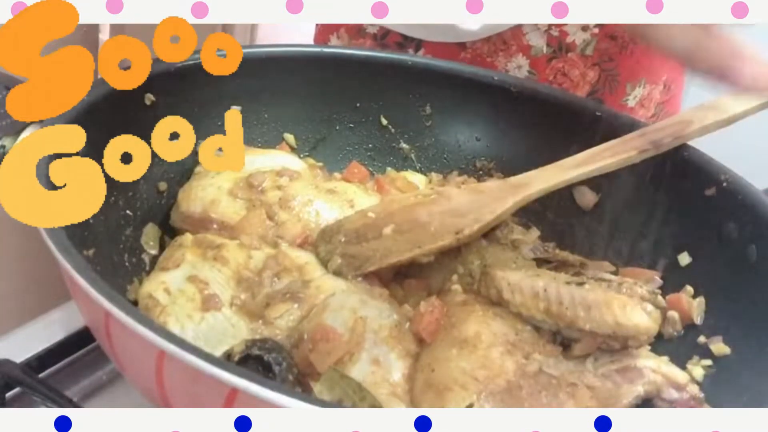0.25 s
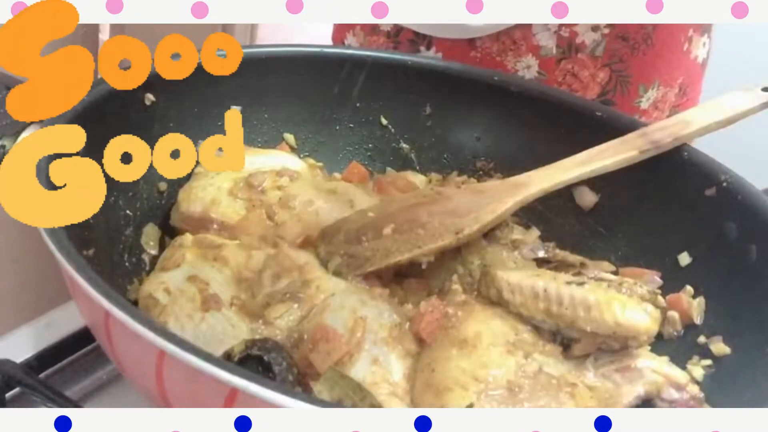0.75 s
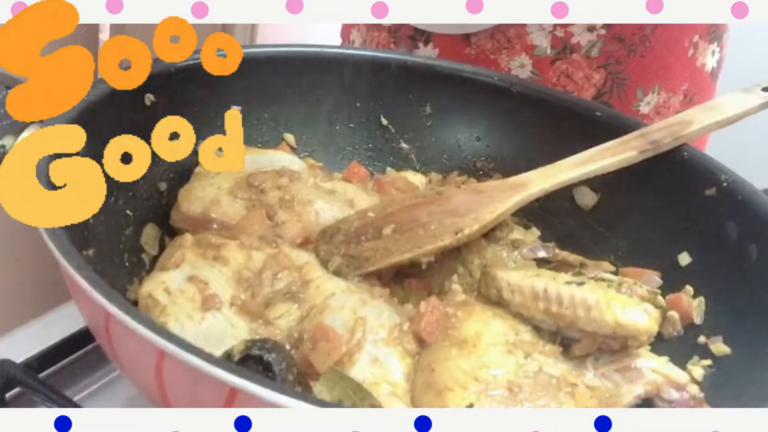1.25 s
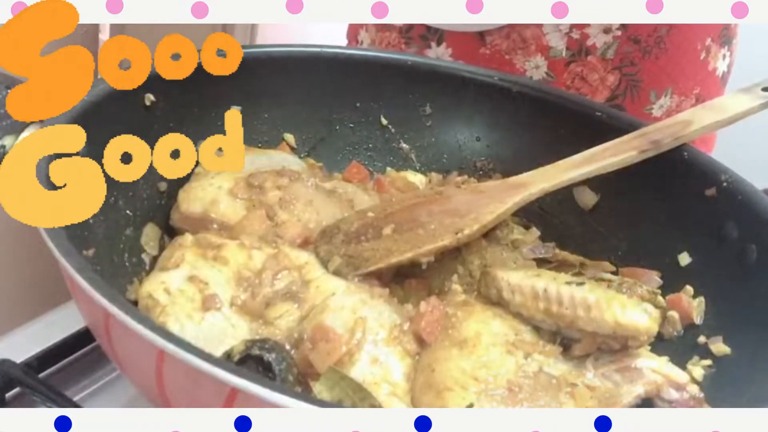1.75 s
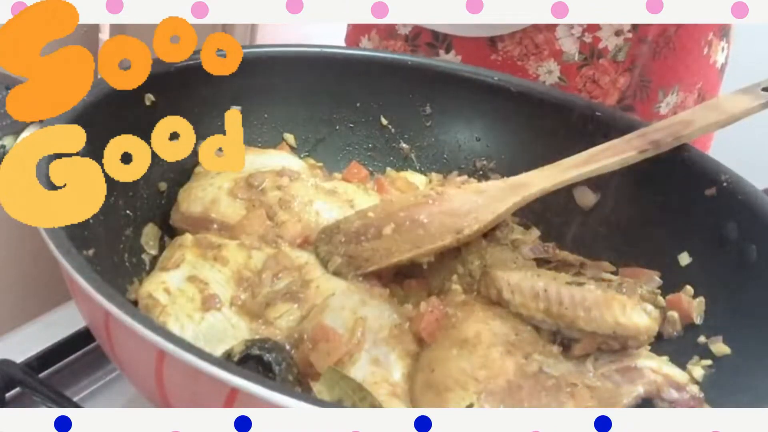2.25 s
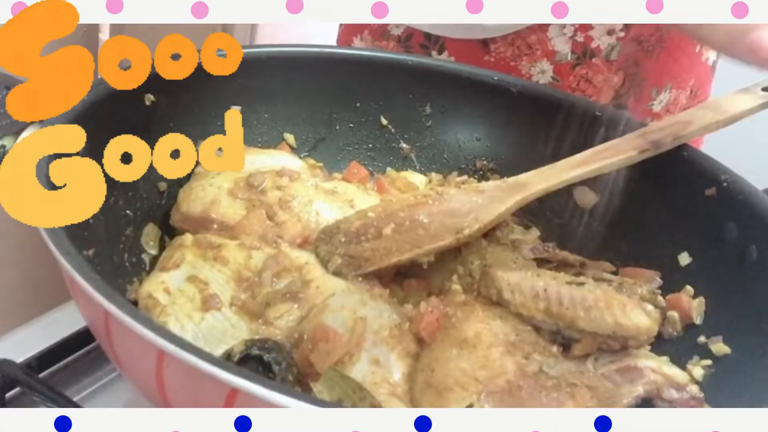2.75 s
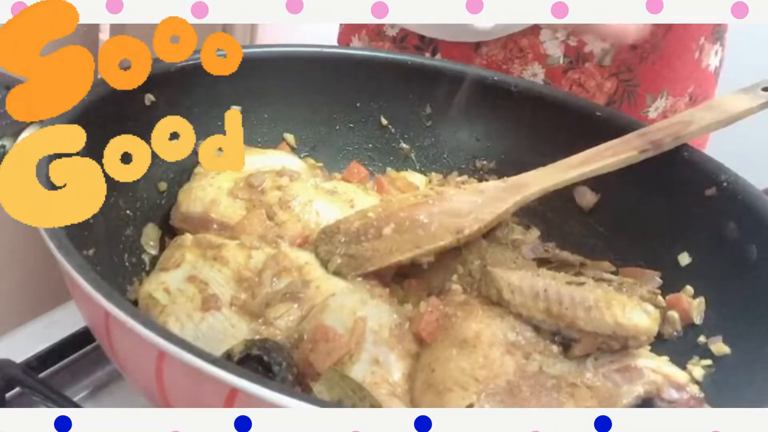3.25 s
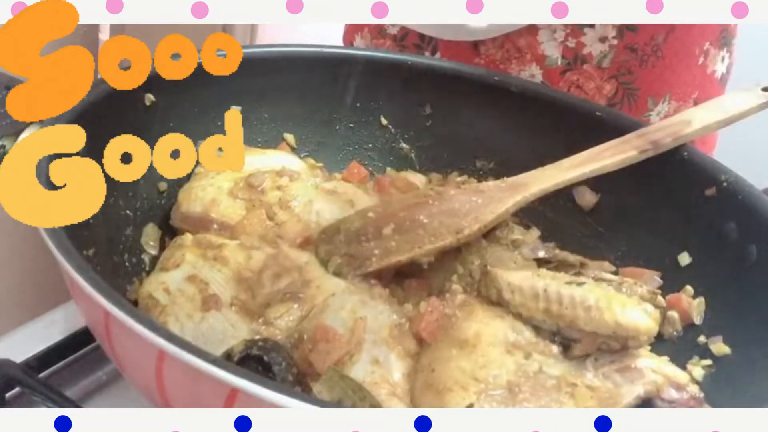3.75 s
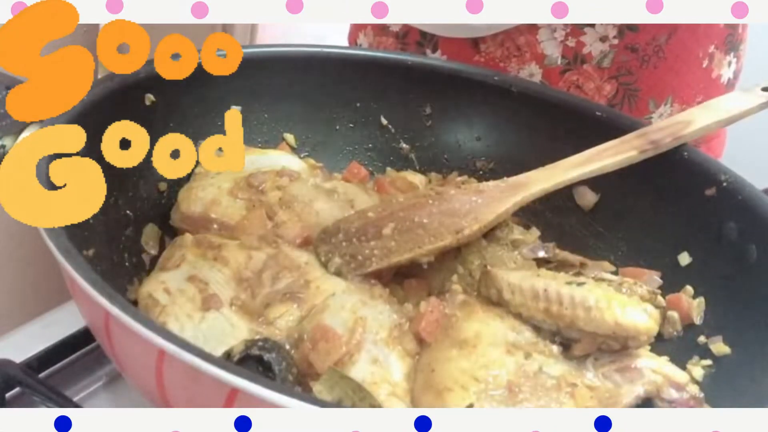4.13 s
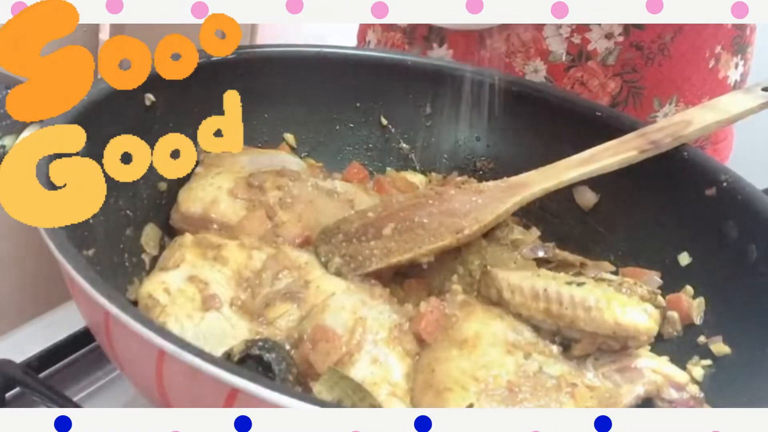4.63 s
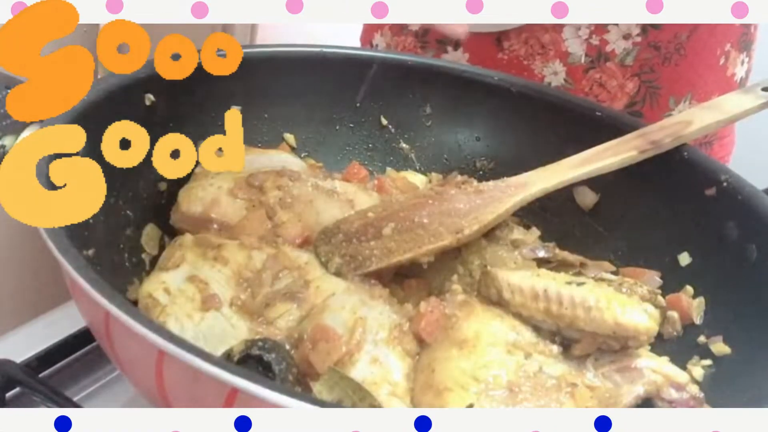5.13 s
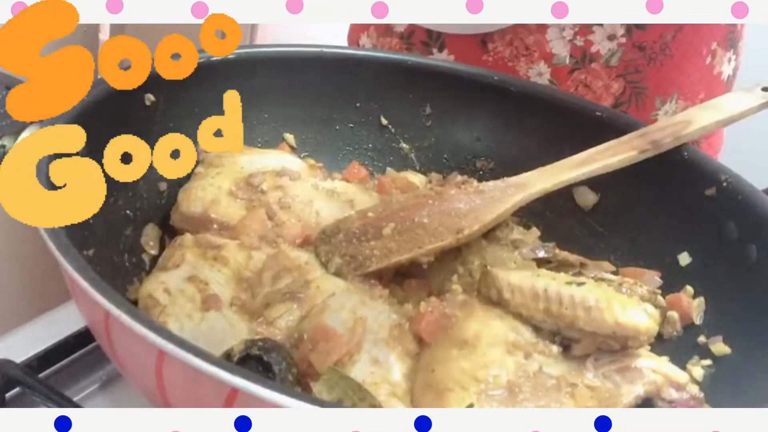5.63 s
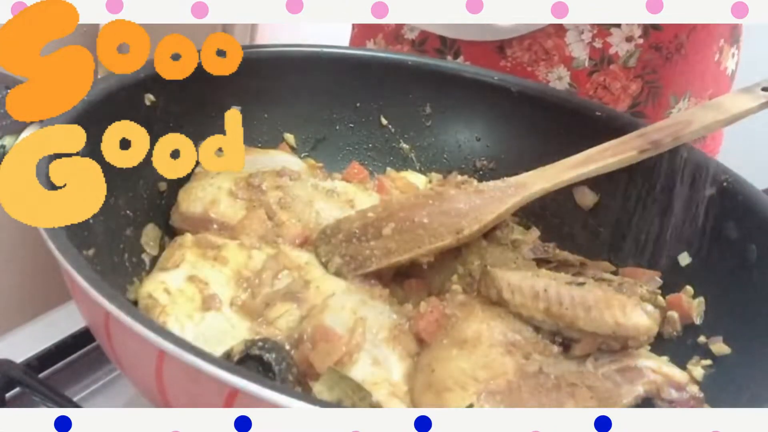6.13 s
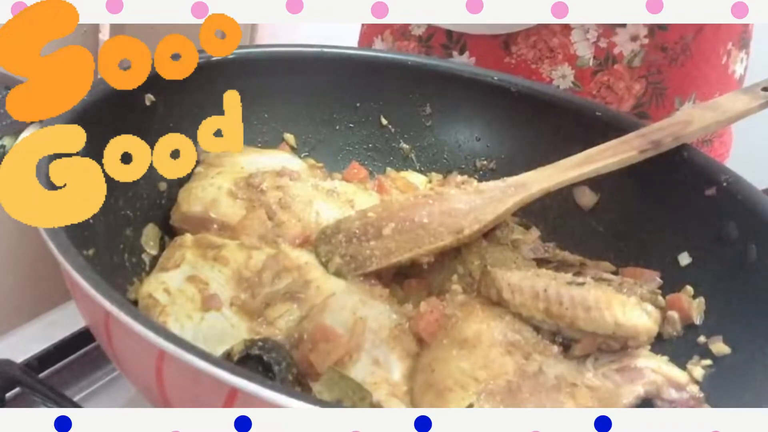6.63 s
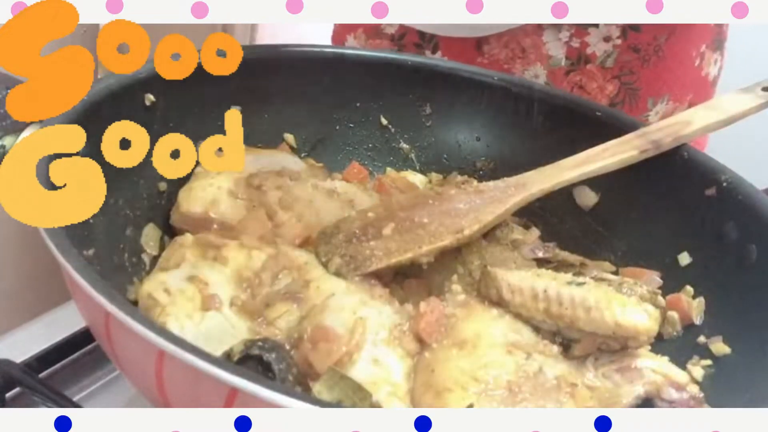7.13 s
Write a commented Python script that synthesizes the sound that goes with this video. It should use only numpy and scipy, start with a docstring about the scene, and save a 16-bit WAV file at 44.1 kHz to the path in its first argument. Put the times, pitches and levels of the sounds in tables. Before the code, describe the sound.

A close, dry salt shaker rattles back and forth in a small kitchen, boomy clacks alternating with bright hissing slides, ending in brief thin shakes.

```python
"""Coarse salt is shaken in a hollow tub close to a microphone, in a small kitchen.
Each swing throws the salt on the base, where it booms, then back on the lid, where it hisses:
streams of random grains drive resonances of the hollow, walls, lid and grip.
Lumps knock singly as taps with a spray of grains; the wrist's turn thumps low as a falling sine.
Shaped noise hums faintly below, and sparse echoes give the kitchen."""
import sys
import numpy as np
from scipy import signal
from scipy.io import wavfile

SR = 44100
rng = np.random.default_rng(int(sys.argv[2]) if len(sys.argv) > 2 else 0)


def log_audio(samples):
    """Write samples as a 16-bit WAV file to the path given in sys.argv[1]."""
    # one column per channel
    frames = np.atleast_2d(samples).T
    # limit to full scale, then quantise
    limited = np.clip(frames, -1, 1)
    pcm = np.round(limited * 32767).astype(np.int16)
    wavfile.write(sys.argv[1], SR, pcm)


N = 325458


def gain_of(db):
    """Amplitude factor of a level in dB."""
    return 10 ** (np.asarray(db) / 20)


def evened(x):
    """Scales x to unit RMS."""
    return x / np.sqrt(np.mean(x ** 2) + 1e-20)


def read(points, hz):
    """Interpolates (f/Hz, value) points over log frequency."""
    f, value = np.transpose(points)
    return np.interp(np.log(hz + 1), np.log(f + 1), value)


def ring(x, modes, low_hz):
    """Passes x through a causal body of unit energy; a small body radiates little below low_hz."""
    hz = abs(np.fft.fftfreq(8192, 1 / SR))
    power = 0
    for f_hz, width_hz, db in modes:
        power = power + gain_of(2 * db) / (1 + (2 * (hz - f_hz) / width_hz) ** 2) ** 1.5
    power = power / (1 + (low_hz / (hz + 1)) ** 8)
    log_gain = np.log(power + 1e-10) / 2
    minimum_phase = np.exp(np.conj(signal.hilbert(log_gain)))
    taps = np.fft.ifft(minimum_phase).real[:3000]
    return signal.oaconvolve(x, taps / np.linalg.norm(taps))[:N]


def scattered(x, modes, low_hz, count=6):
    """The salt lands now here, now there, and each spot favours other resonances."""
    spot = np.repeat(rng.integers(0, count, N // 300 + 1), 300)[:N]
    tilts_db = rng.standard_normal((count, len(modes)))
    tilts_db = 4 * (tilts_db - tilts_db.mean(0))
    out = np.zeros(N)
    for k in range(count):
        tilted = [(f_hz, width_hz, db + tilt) for (f_hz, width_hz, db), tilt in zip(modes, tilts_db[k])]
        out += ring(x * (spot == k), tilted, low_hz)
    return out


def grains(per_s, spread_db, clump_db):
    """Sparse taps of uneven size that swell in clumps, sudden at the front and trailing off."""
    size = gain_of(spread_db * np.minimum(rng.exponential(1, N), 5)) * rng.choice([-1, 1], N)
    fronts = rng.random(N) * (rng.random(N) < 200 / SR)
    clumps = signal.lfilter([1], [1, -np.exp(-1 / (0.0021 * SR))], fronts)
    landed = rng.random(N) < per_s / SR
    return evened(size * landed * (1 + gain_of(clump_db) * clumps))


# steady hum spectrum: (f/Hz, relative density/dB)
HUM_SPECTRUM = [(12, -41), (20, -2), (75, 2), (240, -9), (300, -4), (364, -12), (422, -6), (512, -16),
                (700, -7), (910, -44), (1540, -120)]
HUM_DB, HISS_DB = -56.5, -62.5


def hum():
    """Steady low kitchen noise: random spectra under a fixed curve, plus a faint hiss."""
    frames, hz = N // 512 + 5, np.fft.rfftfreq(2048, 1 / SR)
    real, imag = rng.standard_normal((frames, 1025, 2)).T
    spectra = (real + 1j * imag) * gain_of(read(HUM_SPECTRUM, hz)[:, None])
    steady = signal.istft(spectra, nperseg=2048, noverlap=1536)[1][:N]
    hiss = ring(rng.standard_normal(N), [(2320, 5900, 0)], low_hz=590)
    return gain_of(HUM_DB) * evened(steady) + gain_of(HISS_DB) * hiss


# deep rumble: (t/s, level/dB)
DEEP_LEVEL = [(0, -54), (.4, -53.5), (1.2, -58.5), (2.6, -54.5), (3.9, -63), (5, -54.5), (6.4, -61),
              (7.38, -57.5)]
LOW_DB = -59


def rumble():
    """Unsteady rumble: sparse random taps ring deep and low resonances."""
    level = gain_of(np.interp(np.arange(N) / SR, *np.transpose(DEEP_LEVEL)))
    deep = ring(grains(90, 1.4, 0.5), [(35, 39, -2), (67, 26, 3.0)], low_hz=24.8)
    low = ring(grains(120, 4.0, 2.5), [(142, 107, 0), (305, 94, -2.5), (430, 37, -8)], low_hz=81.4)
    return level * deep + gain_of(LOW_DB) * low


# reverberation: (f/Hz, t60/s)
KITCHEN_T60 = [(250, 1), (700, 0.2), (1800, 0.6), (5000, 0.59), (12000, 0.42)]


def kitchen(x):
    """Sparse echoes of random sign, each band dying at its own speed."""
    taps = np.zeros(SR // 2)
    at = np.arange(200, len(taps) - 20, 20)
    taps[at + rng.integers(0, 20, len(at))] = rng.choice([-1., 1.], len(at))
    hz, t, bands = signal.stft(taps, SR, nperseg=256)
    decay = gain_of(-60 * t / read(KITCHEN_T60, hz)[:, None])
    tail = signal.istft(bands * decay, SR, nperseg=256)[1]
    return signal.fftconvolve(x, tail / np.linalg.norm(tail))[:N]


# resonances of the hand-held tub as a whole: (f/Hz, width/Hz, relative level/dB)
GRIP_MODES = [(110, 33, -3), (205, 195, -7), (418, 84, -3.5), (537, 48, -3)]


def grip(x, low_hz):
    """The whole tub in the hand rings at its low resonances."""
    return ring(x, GRIP_MODES, low_hz)


# wrist turns: (t/s, level/dB, pitch drop/Hz)
WRIST_TURNS = [(.136, -33, 250), (0.369, -44, 200), (.66, -41, 202), (1.331, -35, 276), (1.765, -35, 253),
               (2.0, -44, 280), (2.089, -39.5, 200), (2.392, -33.5, 254), (2.65, -37.5, 250),
               (2.69, -46, 121), (3.011, -45, 250), (3.345, -29.5, 254), (3.739, -41.5, 277),
               (4.105, -37.5, 149), (4.49, -35, 304), (4.905, -39.5, 110), (5.268, -34.5, 167),
               (5.74, -40, 286), (5.984, -38.5, 278), (6.076, -31, 249), (6.558, -47, 287),
               (7.001, -44, 198), (7.216, -41, 179)]


def thumps():
    """A few cycles that slide down to the deep bass, and a dull uneven knock in the grip."""
    sines, knocks, t = np.zeros(N + 5000), np.zeros(N + 5000), np.arange(4000) / SR
    for start_s, db, drop_hz in WRIST_TURNS:
        turns = np.cumsum(40 + drop_hz * np.exp(-t / 0.0098)) / SR
        swell = (1 - np.exp(-t / 0.0023)) * gain_of(db - 60 * t / 0.14)
        at = int(start_s * SR)
        sines[at:][:len(t)] += swell * np.sin(2 * np.pi * turns)
        knocks[at:][:len(t)] += swell * rng.standard_normal(len(t))
    return sines[:N] + gain_of(-12.5) * grip(knocks, low_hz=68.7)


TAIL_OFF_DB_PER_S2 = 303  # the last grains settle ever faster


def streams(rows, start_db, fall_db_per_s):
    """Each stream sets in suddenly, builds to its level and dies away; streams add in power."""
    power = np.zeros(N + SR)
    t = np.arange(SR // 2) / SR
    for start_s, build_s, db in rows:
        rise_db = start_db * (1 - t / build_s)
        over_s = t - build_s
        fall_db = -fall_db_per_s * over_s - TAIL_OFF_DB_PER_S2 * over_s ** 2
        shape_db = np.where(over_s < 0, rise_db, fall_db)
        power[int(start_s * SR):][:len(t)] += gain_of(db + shape_db) ** 2
    return np.sqrt(power[:N])


# salt sliding back on the lid: (t/s, length/s, hiss level/dB)
LID_SLIDES = [(0, .15, -35), (.39, 0.12, -36), (.6, 0.07, -36.5), (.71, 0.065, -35.5), (1.0, 0.086, -41.5),
              (1.32, 0.099, -40.5), (1.46, 0.073, -46), (1.64, 0.025, -37.5), (1.74, .09, -41.5),
              (1.94, 0.21, -38), (2.39, .03, -40), (2.645, .14, -35.5), (2.958, 0.15, -45),
              (3.072, .06, -38), (3.35, 0.015, -37), (3.46, .06, -39.5), (3.72, 0.14, -39.5),
              (4.05, 0.19, -40.5), (4.49, .18, -39.5), (4.89, .13, -42.5), (5.2, 0.21, -40.5),
              (5.56, 0.26, -45), (5.99, 0.17, -38.5), (6.35, 0.1, -41), (6.911, 0.062, -29.5),
              (7.088, 0.063, -32.5), (7.264, 0.063, -29)]
SLIDE_START_DB, SLIDE_FALL_DB_PER_S, SLIDE_BOOM_DB = -3, 195, -17.5
# salt thrown on the base: (t/s, build-up/s, boom level/dB, hiss level/dB)
BASE_THROWS = [(0, 0.017, -45.5, -58), (0.204, 0.087, -32, -36.5), (0.517, 0.012, -25, -33.5),
               (0.808, 0.089, -30.5, -36), (1.15, 0.042, -29, -38), (1.525, 0.037, -27.5, -38.5),
               (1.835, 0.04, -34, -34), (2.155, 0.02, -32, -32.5), (2.466, 0.059, -29, -37.5),
               (2.802, .016, -44, -36), (3.149, 0.025, -27, -30.5), (3.537, 0.056, -25.5, -35),
               (3.905, 0.059, -30, -35.5), (4.285, 0.057, -33.5, -37), (4.687, 0.076, -33.5, -42),
               (5.074, 0.051, -29.5, -35), (5.438, 0.04, -27.5, -35.5), (5.808, 0.074, -36.5, -36),
               (6.138, .08, -33, -38), (6.505, 0.045, -51, -39), (6.553, 0.006, -21.5, -35)]
THROW_START_DB, BOOM_FALL_DB_PER_S, HISS_FALL_DB_PER_S = -6, 244, 107


def swings():
    """Envelopes of the salt on base and lid; throws also hiss and slides also boom."""
    slides = streams(LID_SLIDES, SLIDE_START_DB, SLIDE_FALL_DB_PER_S)
    boom_rows = [(start, build, boom_db) for start, build, boom_db, _ in BASE_THROWS]
    hiss_rows = [(start, build, hiss_db) for start, build, _, hiss_db in BASE_THROWS]
    boom = streams(boom_rows, THROW_START_DB, BOOM_FALL_DB_PER_S)
    hiss = streams(hiss_rows, SLIDE_START_DB, HISS_FALL_DB_PER_S)
    return np.hypot(boom, gain_of(SLIDE_BOOM_DB) * slides), np.hypot(hiss, slides)


# single lumps: (t/s, relative level/dB, height in the tub: 0 base - 1 lid)
SALT_LUMPS = [(.081, -16.5, 0.87), (.133, -19, 0.91), (.208, -19.5, 0.98), (.231, -18.5, .01),
              (.252, -17, 0.48), (.265, -10.5, 0.083), (0.291, -28, .05), (.305, -27, 1),
              (.382, -17.5, 0.84), (.442, -32.5, .95), (.529, -14.5, 0.031), (.547, -11, 0.19),
              (.714, -33, .75), (.728, -24, 0.93), (.75, -27, 1), (.824, -17.5, .2), (.848, -21, .1),
              (.862, -10.5, .01), (1.068, -16.5, 0.73), (1.151, -16.5, 0.12), (1.278, -18, 0.7),
              (1.329, -28.5, 0.26), (1.498, -19, 0.52), (1.5264, -7, 0.011), (1.72, -18.5, 0.79),
              (1.764, -17.5, .7), (1.836, -13.5, .01), (1.877, -13.5, 0.23), (1.958, -16.5, 0.66),
              (1.999, -26.5, .4), (2.083, -14, 0.77), (2.16, -21, 0.064), (2.192, -9.5, 0.49),
              (2.331, -24, 0.47), (2.392, -23, 0.53), (2.467, -9.5, 0.58), (2.483, -12.5, 0.085),
              (2.519, -13.5, 0.15), (2.651, -32, .7), (2.743, -18, 0.94), (2.808, -10, 0.083),
              (2.826, -12, 0.56), (2.962, -31, 0.93), (2.983, -18, 0.83), (3.081, -20, 0.88),
              (3.1487, -1.5, 0.0075), (3.222, -15, 0.15), (3.274, -27, 0.96), (3.345, -21.5, 0.32),
              (3.464, -33, 1), (3.539, -15, .33), (3.551, -12.5, 0.12), (3.573, -9.5, .01),
              (3.612, -11.5, 0.18), (3.68, -14, 0.74), (3.797, -30, 0.5), (3.889, -14.5, 0.79),
              (3.911, -18, 0.16), (3.934, -13, .01), (4.17, -47, 0.24), (4.212, -27.5, 0.99),
              (4.289, -24, 0.11), (4.304, -14, 0.14), (4.361, -14.5, .25), (4.374, -15, 0.089),
              (4.49, -27.5, .33), (4.5, -21.5, 0.66), (4.603, -30, 0.92), (4.639, -35, .7),
              (4.692, -18, 0.24), (4.707, -23, .2), (4.745, -13, 0.061), (4.929, -27, 0.98),
              (4.966, -19.5, 0.74), (5.039, -15, 0.61), (5.077, -27, 0.25), (5.092, -7, 0.15),
              (5.242, -16, 0.82), (5.278, -17, 0.86), (5.292, -24, .8), (5.429, -22, 0.27),
              (5.439, -17.5, 0.033), (5.473, -12.5, 0.21), (5.502, -14.5, 0.46), (5.584, -18.5, 0.75),
              (5.742, -16.5, 0.78), (5.814, -24.5, .03), (5.839, -18, 0.071), (5.865, -11, 0.15),
              (5.895, -21, .4), (5.978, -16, 0.78), (6.063, -31, 0.62), (6.153, -16.5, .01),
              (6.205, -15, .01), (6.351, -20.5, 0.62), (6.502, -29, 0.24), (6.517, -12.5, 0.19),
              (6.5565, -8, 0.067), (6.887, -38, 0.61), (6.913, -18.5, 0.93), (6.951, -29, .95),
              (7.091, -26, 0.8), (7.127, -18, 0.86), (7.269, -20, 0.98)]
LUMP_S, LUMP_DB, LUMP_HEIGHT = np.transpose(SALT_LUMPS)
# how a lump drives each part:
# (height 0-1, hollow level/dB, lower walls level/dB, upper walls level/dB, lid level/dB)
LUMP_REACH = [(0, 8.5, -1, 5, -28), (.33, 2, 10.5, -1.1, -10), (.67, -18.5, -8, 2.5, -18),
              (1, -14, -15.5, -21.5, 10.5)]


def lump_levels():
    """A lump's height sets how hard it drives hollow, lower walls, upper walls and lid."""
    height, *parts_db = np.transpose(LUMP_REACH)
    return [LUMP_DB + np.interp(LUMP_HEIGHT, height, part_db) for part_db in parts_db]


def lumps(db, spray_db, spray_t60_s):
    """Each lump is one tap followed by a spray of loose grains that dies away."""
    taps = np.zeros(N)
    np.add.at(taps, (LUMP_S * SR).astype(int), gain_of(db))
    fade = gain_of(spray_db - 60 * np.arange(6000) / SR / spray_t60_s)
    return taps + signal.oaconvolve(taps, fade)[:N] * grains(6000, 2.46, -3)


# air resonances: (f/Hz, width/Hz, relative level/dB)
HOLLOW_MODES = [(820, 97, -3), (850, 13, 4.5), (882, 70, 1.5), (880, 700, -4), (1140, 250, -7)]


def hollow(blows):
    """The air inside builds up: a broad resonance feeds the narrow ones."""
    air = ring(blows, [(916, 1430, 0.012)], low_hz=700)
    return ring(air, HOLLOW_MODES, low_hz=696)


# wall resonances: (f/Hz, width/Hz, relative level/dB)
LOWER_WALL_MODES = [(1460, 27, 0.5), (1728, 350, -3), (1985, 270, -7)]
UPPER_WALL_MODES = [(2320, 140, -6), (2760, 730, -2), (3390, 1400, -3.5), (4250, 120, -5.5),
                    (4560, 1130, -3), (6400, 1400, -15), (10200, 6400, -26)]


def walls(heavy, lower_db, upper_db):
    """Heavy grains and lumps ring the walls; the upper resonances vary with the spot hit."""
    lower = gain_of(-1.5) * heavy + lumps(lower_db, -21.5, 0.054)
    upper = gain_of(0.5) * heavy + lumps(upper_db, -21.5, 0.12)
    return ring(lower, LOWER_WALL_MODES, low_hz=1280) + scattered(upper, UPPER_WALL_MODES, low_hz=1880)


# lid resonances: (f/Hz, width/Hz, relative level/dB)
LID_MODES = [(1806, 510, 0), (3010, 970, 2), (4320, 910, 0), (5080, 1600, 0.5), (6470, 3200, 0),
             (8400, 2700, -4.5), (10400, 4100, 0.5), (12400, 1500, -10.5)]


def lid(envelope, tick_db):
    """Dust, coarse grains and lumps hiss and tick on the lid, spot by spot."""
    dust, coarse = grains(9000, 3.0, 1.4), grains(250, 3.6, 3)
    fine = envelope * (gain_of(-1.0) * dust + gain_of(-7) * coarse)
    return scattered(fine + lumps(tick_db, -13, 0.051), LID_MODES, low_hz=1430)


def tub():
    """Streams and lumps drive the hollow, the walls, the lid and the grip."""
    base_envelope, lid_envelope = swings()
    hollow_db, lower_db, upper_db, tick_db = lump_levels()
    # the same grains sound in hollow and walls
    many, few = grains(3000, 3.56, 1.3), grains(200, 4.1, 3)
    heavy = base_envelope * (gain_of(-3) * many + gain_of(-10) * few)
    blows = heavy + lumps(hollow_db, -21.5, 0.11)
    boom = gain_of(-12.5) * hollow(blows)
    body = gain_of(-19) * grip(blows, low_hz=69)
    return boom + walls(heavy, lower_db, upper_db) + lid(lid_envelope, tick_db) + body


def scene():
    """Mixes the tub, its echoes, the thumps and the background."""
    salt = tub()
    echoes = gain_of(-10.5) * kitchen(salt)
    return (salt + echoes + thumps() + hum() + rumble())[None]


TREBLE_HZ, EDGE_HZ = 13300, 15800


def record(dry):
    """The microphone loses the top treble; then the band limit of the recorder."""
    dull = signal.sosfilt(signal.butter(3, TREBLE_HZ, fs=SR, output="sos"), dry)
    band_limit = signal.firwin(511, EDGE_HZ, window=("kaiser", 9), fs=SR)
    return signal.oaconvolve(dull, band_limit[None], "same")


dry = scene()
out = record(dry)
log_audio(out)
```